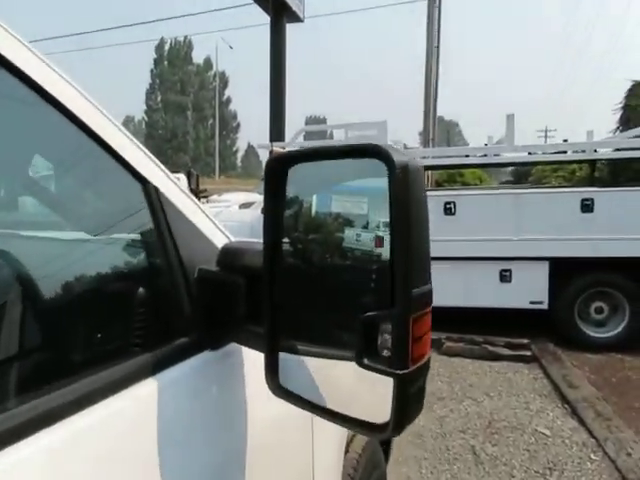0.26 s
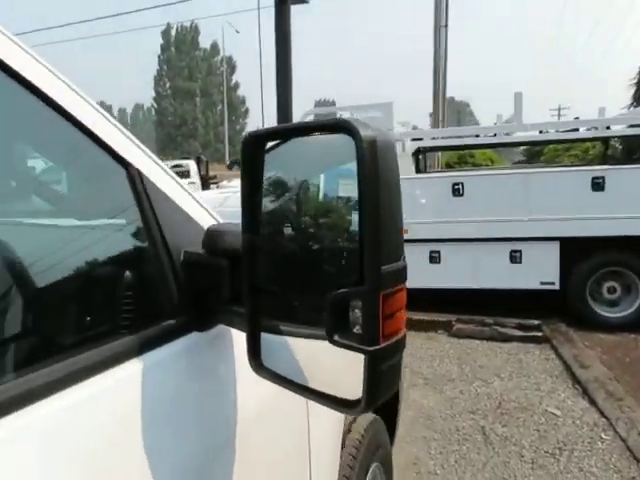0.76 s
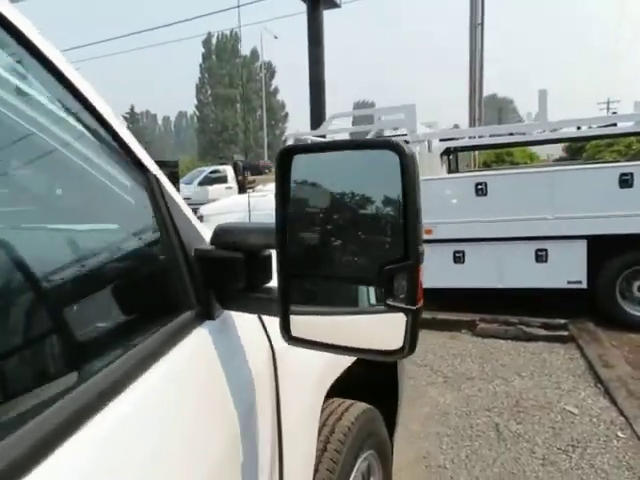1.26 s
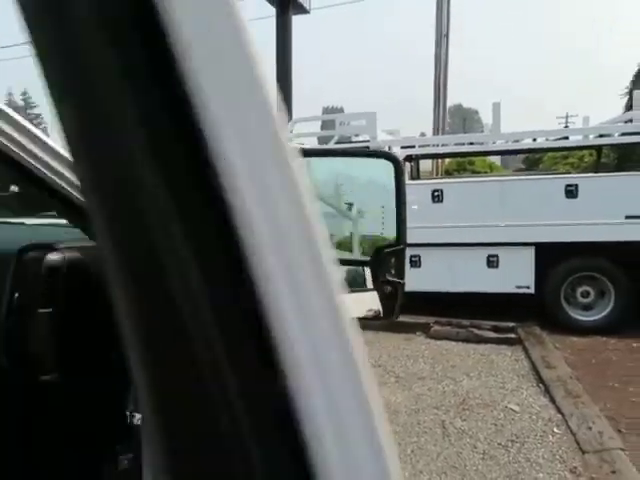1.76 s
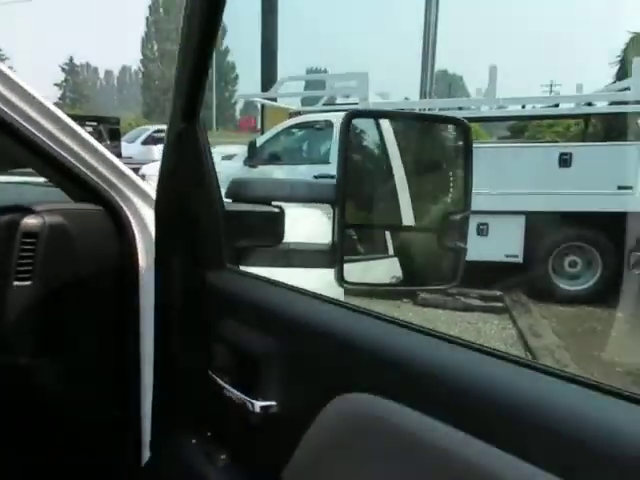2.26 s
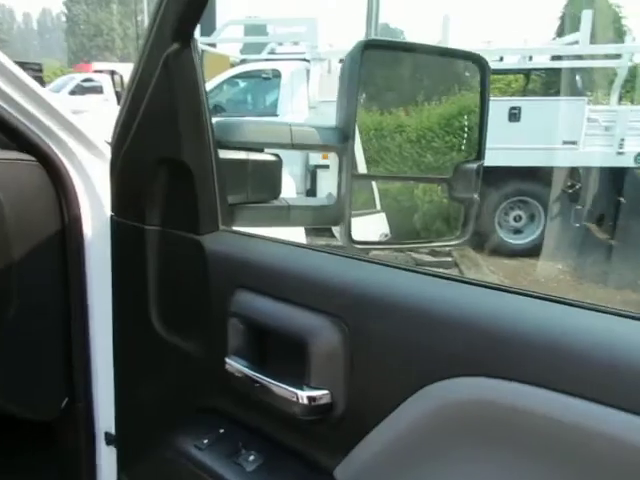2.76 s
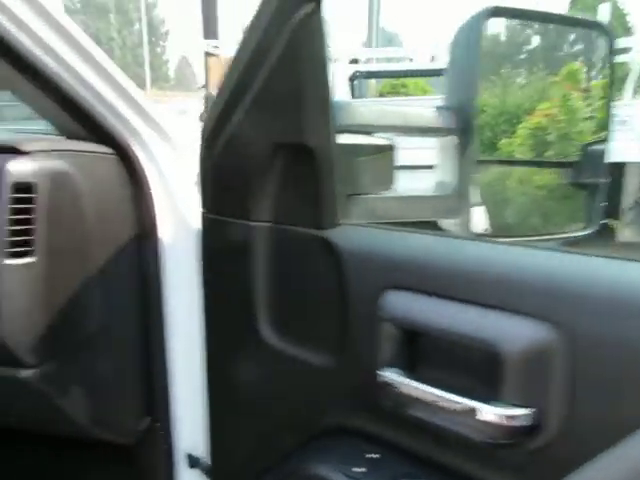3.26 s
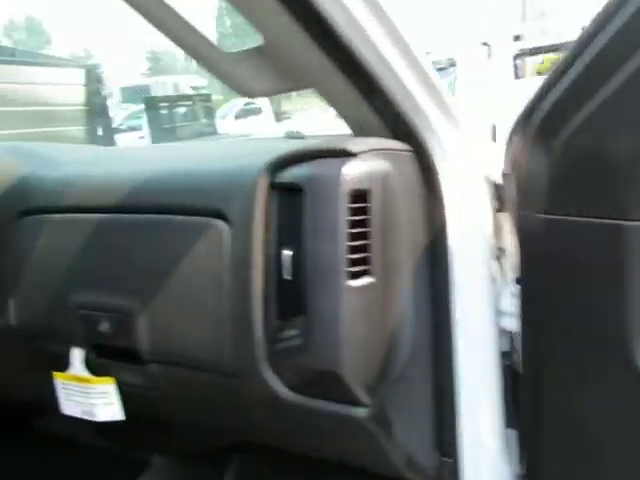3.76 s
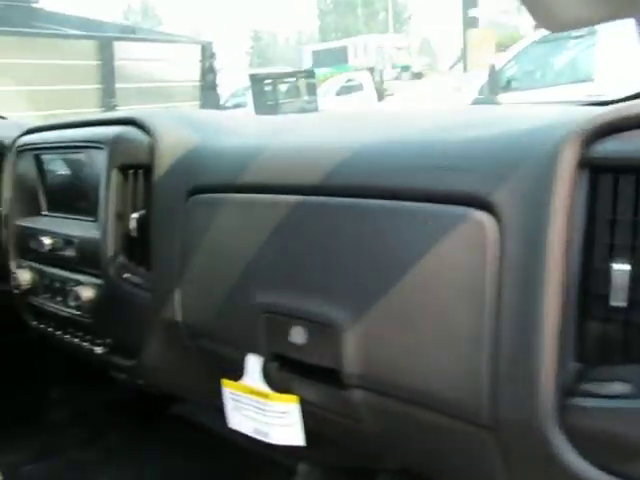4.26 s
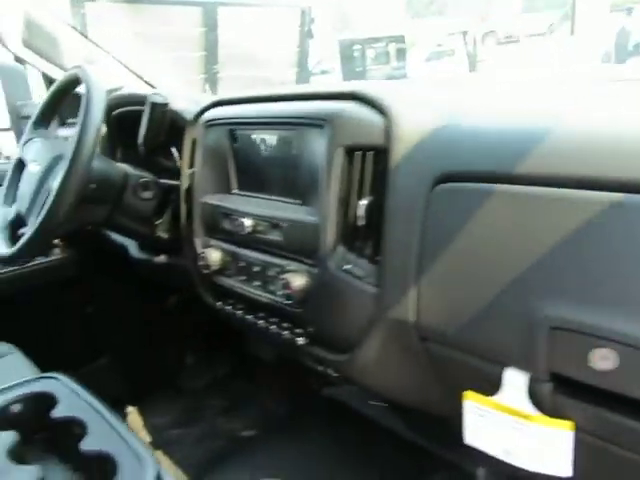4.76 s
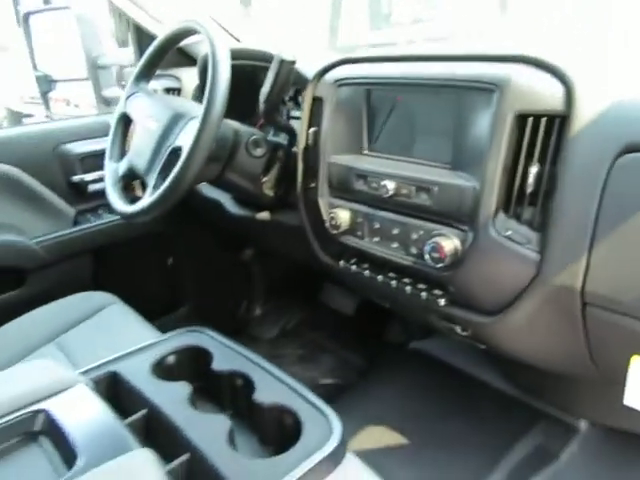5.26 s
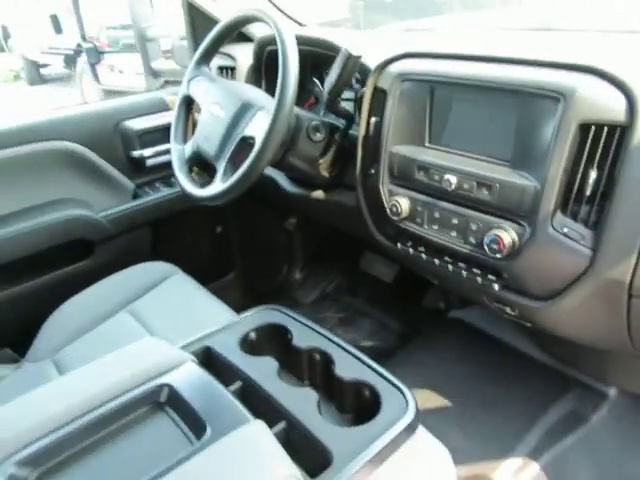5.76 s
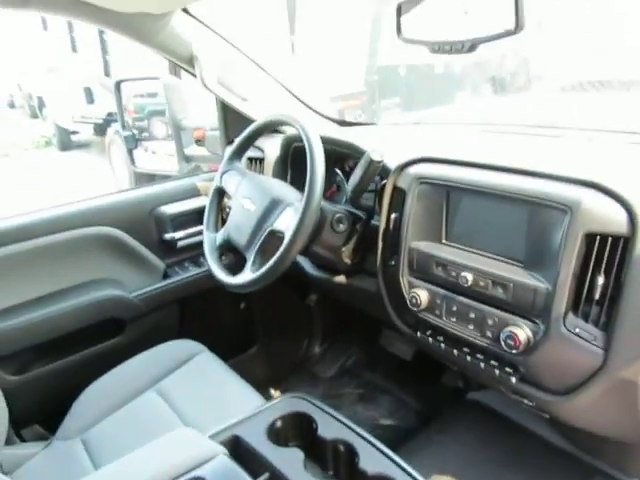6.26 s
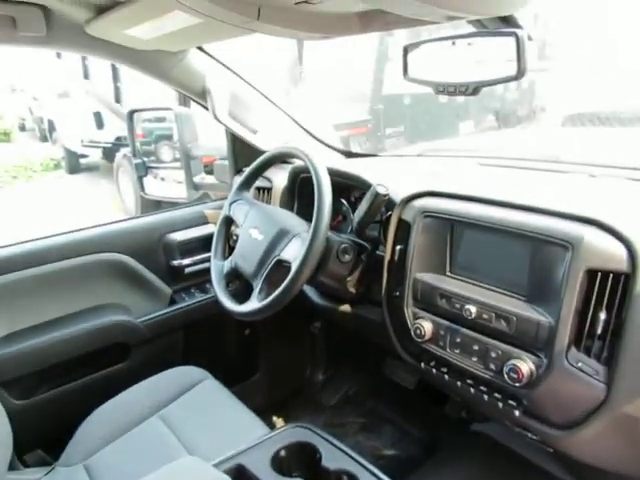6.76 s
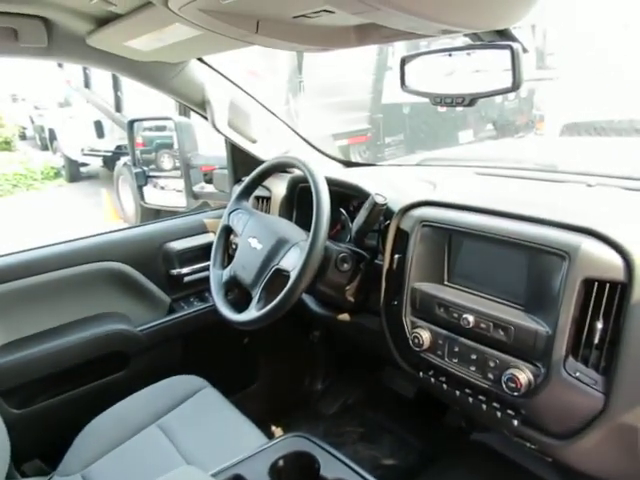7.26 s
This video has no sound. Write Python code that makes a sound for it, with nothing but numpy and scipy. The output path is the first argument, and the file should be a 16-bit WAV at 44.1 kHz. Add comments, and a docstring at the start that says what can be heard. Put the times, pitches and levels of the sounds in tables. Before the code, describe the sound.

In an open gravel yard, a diesel truck on a nearby road pulls away with a deep, throaty roar, changes gear and climbs in pitch as it recedes. Very close to the microphone a door handle clunks, then the latch releases with a sharp loud bang. Light ticks and scuffs follow, thickest midway, before the engine dwindles to faint road rumble and a distant throb.

```python
"""From a gravel yard: a six-cylinder diesel truck on a nearby road accelerates, shifts gear and fades.
Its exhaust is tones locked to the firings; block, valves, tyres and air are knocks and coloured noise.
Small ticks and scuffs, short pushes through resonances, lie from 0.2 to 6 s, thickest just after 3 s.
Close to the microphone a door handle is pulled at 0.8 s; at 1.3 s the latch lets go with a bang.
From 5.7 s a throb swells up from far off. The gain drops after loud peaks and creeps back."""
import sys
import numpy as np
from scipy.fft import rfft, irfft, next_fast_len
from scipy.io import wavfile
from scipy.ndimage import uniform_filter1d, map_coordinates

SR = 44100
rng = np.random.default_rng(int(sys.argv[2]) if len(sys.argv) > 2 else 0)


def master_out(mix):
    """Clip the mix to full scale and print it as 16-bit PCM to the path in sys.argv[1]."""
    frames = np.transpose(np.atleast_2d(mix))
    ceiling = np.clip(frames, -1, 1)
    pcm = np.round(ceiling * 32767).astype(np.int16)
    wavfile.write(sys.argv[1], SR, pcm)


N = 331191


def amp(db):
    """dB to gain."""
    return 10 ** (np.asarray(db) / 20)


def unit(x):
    """x at rms 1."""
    return x / np.sqrt(np.mean(x ** 2) + 1e-20)


def along(points, hz):
    """(frequency_hz, value) points read off on a log frequency axis."""
    point_hz, values = np.transpose(points)
    return np.interp(np.log(hz + 1), np.log(point_hz + 1), values)


def curves(rows):
    """One value per sample for each column after the time."""
    times_s, *columns = np.transpose(rows)
    return [np.interp(np.arange(N) / SR, times_s, column) for column in columns]


def wobble(rate):
    """A smooth random curve, rate knots a second."""
    knots = rng.standard_normal(int(N * rate / SR) + 4)
    return map_coordinates(knots, [np.arange(N) * rate / SR])


def filtered(x, response):
    """x times a complex response of frequency."""
    m = next_fast_len(N + SR // 2)
    return irfft(rfft(x, m) * response(np.fft.rfftfreq(m, 1 / SR)), m)[..., :N]


def body(modes):
    """Causal response of a set of resonances, with alternating signs."""
    def response(f):
        total = 0
        for k, (centre, width, db) in enumerate(modes):
            total = total + (-1) ** k * amp(db) * 1j * f * width / (centre ** 2 - f ** 2 + 1j * f * width)
        return total
    return response


def soft_body(modes, corner_hz):
    """Resonances struck by a soft contact, which dulls them above the corner."""
    return lambda hz: body(modes)(hz) / (1 + 1j * hz / corner_hz) ** 3


def rush(spectrum, alike, gate=1):
    """Stereo noise of rms 1, gated before it is coloured; alike is the left-right correlation."""
    def mid_side(hz):
        turn = np.arccos(np.clip(along(alike, hz), -1, 1)) / 2
        return amp(along(spectrum, hz)) * [np.cos(turn), np.sin(turn)]
    mid, side = filtered(gate * rng.standard_normal((2, N)), mid_side)
    return unit(np.array([mid + side, mid - side]))


def tone(cycles, db, flutter_db):
    """A sine of given rms level whose size flutters on the way through the air."""
    return np.sqrt(2) * amp(db + flutter_db * wobble(12)) * np.cos(2 * np.pi * cycles)


def burst(events, column, t60, rough, wide):
    """One push per event, dying 60 dB in t60 s; rough is its noise share, wide its left-right share."""
    out = np.zeros((2, N + SR))
    t = np.arange(SR // 10) / SR  # each push is cut at 0.1 s
    for row in events:
        noise = rng.standard_normal((2, len(t)))
        push = 1 - rough + rough * noise[0] + wide * noise[1] * np.array([[1], [-1]])
        level_db = row[1] + row[column] * (column > 1)  # column 1 is the peak level itself
        start = round(row[0] * SR)
        out[:, start:start + len(t)] += amp(level_db - 60 * t / t60) * push / np.sqrt(t60 * SR)
    return out[:, :N]


# The engine pulls, shifts gear and pulls away; boom is the second firing order.
# Columns: start_s, firing_rate_hz, boom_db, overtones_db
ENGINE = [(0, 56, -26.5, -34.5), (.1, 58.3, -19, -28), (.2, 61.82, -15, -28.5), (.4, 64.85, -12.5, -26),
          (.6, 67, -11.5, -24.5), (.7, 71, -12.5, -20.5), (1.07, 71.9, -15.5, -27),
          (1.2, 69.64, -14, -26.5), (1.38, 68.83, -14.5, -24.5), (1.5, 69.27, -13.5, -26),
          (1.65, 73.9, -15, -30), (1.95, 77.9, -17.5, -27.5), (2.1, 80.23, -20, -32),
          (2.25, 80.37, -15.5, -31), (2.7, 87.04, -17.5, -29), (3.0, 89.55, -18, -26.5),
          (3.3, 91.85, -18.5, -30.5), (3.45, 92.46, -18.5, -31), (3.9, 93.76, -23.5, -31.5),
          (4.1, 92.8, -29, -37), (4.5, 93.2, -32, -35), (4.95, 92.6, -41, -39.5), (5.25, 89.6, -37, -65),
          (5.75, 89.35, -40, -42), (6.2, 88.1, -61.5, -51.5)]
# Strength of successive firings, repeating each turn of the shaft. Column: level_db
CYLINDER_DB = [0, -4, -4]
# Road and engine noise; clatter, rumble and drone are relative to the roar.
# Columns: start_s, roar_db, clatter_over_roar_db, rumble_over_roar_db, drone_over_roar_db
ROAD = [(0, -26, -12.5, 1.5, -8), (.3, -24, -12.5, 1, -12.5), (.45, -22, -18, 1, -14),
        (.75, -23.5, -13.5, 1.5, -11.5), (1.07, -23.5, -13, -1.5, -15), (1.4, -27, -14.5, -3, -10.5),
        (1.65, -26, -13, -1, -15), (2.0, -28.5, -9.5, 1, -12.5), (2.55, -30, -12, 5, -10.5),
        (2.9, -28.5, -10, -1, -9), (3.2, -27, -13.5, 1, -15), (3.7, -28, -11.5, 0, -9.5),
        (4.05, -29.5, -11, 3, -12.5), (4.45, -28.5, -11, -3, -9.5), (4.9, -31.5, -9.5, 2, -5.5),
        (5.3, -35, -9.5, -0.5, -8.5), (6.0, -33.5, -12.5, 2, -9.5), (6.7, -34.5, -12, 0.5, -9.5),
        (7.5, -36, -10, 2.5, -8)]


def truck():
    """One firing count drives exhaust, knock and the struck noises, so all keep time together."""
    firing_hz, boom_db, overtone_db = curves(ENGINE)
    firings = np.cumsum(firing_hz) / SR + 0.018 * wobble(6)
    pipe = exhaust(firings, firing_hz, boom_db, overtone_db)
    count = np.floor(firings).astype(int)
    size = amp(np.array(CYLINDER_DB)[count % len(CYLINDER_DB)] + 1.5 * rng.standard_normal(2000)[count])
    strike = size * np.exp(-4.5 * (firings % 1))  # each firing hits and dies away
    roar_db, clatter_db, rumble_db, drone_db = curves(ROAD)
    rumble_db, clatter_db, drone_db = roar_db + rumble_db, roar_db + clatter_db, roar_db + drone_db
    near = amp(0.82 * (boom_db.clip(-45, -15) + 1.5))  # a distant engine blurs into even noise
    noise = road_noise(roar_db, clatter_db, rumble_db, drone_db, near * strike)
    puffs = np.diff(count, prepend=0) * size
    return pipe + noise + combustion_knock(puffs, near, clatter_db)


# Firing orders of the overtones, as multiples of the firing rate, and their levels.
# Columns: order; level_over_overtones_db
FIRING_ORDERS = [1, 3, 4, 5, 6]
ORDER_DB = [-5, 0.5, 0, -2, -4.5]
# What pipe and street do to an overtone at each pitch. Columns: pitch_hz, level_db
PASSAGE = [(55, -11), (70, 4), (170, 0.5), (205, -4), (230, 9.5), (252, -2), (280, -24.5), (300, 1),
           (325, 1.5), (345, -9), (372, 1.5), (420, -16), (460, 2.5), (485, 2), (510, -18.5), (560, -25.5)]
# Share of that colour while the truck is close, until when, and the moment it is whole
NEAR_SHARE, NEAR_S, CLEAR_S = 0.2, 0.8, 0.99
# A hum between the orders. Columns: start_s, level_db
SIDE_TONE = [(0, -23.5), (.2, -28), (.65, -61.5), (1.07, -40.5), (1.38, -35.5), (2.4, -26.5), (2.85, -30.5),
             (3.2, -59), (6.2, -57.5)]
SIDE_ORDER = 8 / 3  # times the firing rate
# Uneven cylinders leave tones at thirds of the firing rate.
# Columns: thirds, level_over_shaft_db; then start_s, shaft_db
SHAFT = [(4, -20.5), (5, -6), (7, -7), (10, -16), (11, -15.5), (13, -9.5), (14, -10.5), (16, -11.5),
         (17, -23), (19, -16.5), (20, -21.5), (21, -17)]
SHAFT_LEVEL = [(0, -29.5), (.35, -25.5), (.7, -23), (1.35, -32.5), (2.2, -34), (3.5, -33), (4.5, -38.5),
               (6.2, -63)]
# A cover rings with the high firing orders. Columns: start_s, resonance_hz, level_db
COVER = [(2.45, 1151, -63), (2.65, 1176, -42.5), (2.78, 1229, -39.5), (2.95, 1180, -43), (3.05, 1236, -39),
         (3.09, 1210, -54), (3.18, 1215, -44), (3.21, 1219, -38), (3.26, 1242, -47), (3.31, 1254, -40),
         (3.43, 1290, -42.5), (3.5, 1244, -39), (3.6, 1134, -43.5), (4, 1140, -44.5), (4.1, 1266, -61),
         (4.25, 1268, -43), (4.7, 1260, -50), (4.95, 1100, -49), (5.2, 1103, -65)]


def exhaust(firings, firing_hz, boom_db, overtone_db):
    """Firing orders in step add up to a sharp suction pulse a firing; shaft orders swell it once a turn."""
    share = np.interp(np.arange(N) / SR, [NEAR_S, CLEAR_S], [NEAR_SHARE, 1])
    levels = []
    for order, db in zip(FIRING_ORDERS, ORDER_DB):
        colour_db = share * along(PASSAGE, order * firing_hz)
        levels.append((order, overtone_db + db + colour_db + 0.97 * wobble(4.6)))
    levels.append((2, boom_db + 0.6 * wobble(6)))
    levels.append((SIDE_ORDER, curves(SIDE_TONE)[0]))
    pipe = np.zeros(N)
    for order, db in levels:
        drift = (0.02 + 0.04 * share) * wobble(12)  # in cycles
        pipe -= tone(order * firings + drift, db, flutter_db=1.2)

    turns = firings / len(CYLINDER_DB)
    shaft_db, = curves(SHAFT_LEVEL)
    for third, db in SHAFT:
        pipe -= tone(round(third) * turns + 0.07 * wobble(6.6), shaft_db + db, flutter_db=2)

    cover_hz, cover_db = curves(COVER)
    for third in range(33, 46):
        off = (third * firing_hz / len(CYLINDER_DB) - cover_hz) / 75  # distance from the resonance
        db = cover_db - 6.9 * (third % len(CYLINDER_DB) > 0)  # weaker between whole orders
        pipe += tone(third * turns + 0.12 * wobble(8), db, flutter_db=1.0) / (1 + off ** 2)
    return pipe


# Resonances of the engine block, each passed twice. Columns: pitch_hz, width_hz, level_db
BLOCK = [(1200, 410, 1.5), (1590, 580, -0.5)]
KNOCK_DB = 1  # over the clatter, before distance softens it


def combustion_knock(puffs, near, clatter_db):
    """One clean impulse a firing rings the block and weakens with the boom."""
    ringing = unit(filtered(puffs, lambda hz: body(BLOCK)(hz) ** 2))
    return near * amp(clatter_db + KNOCK_DB) * ringing


# Noise colours, relative density. Columns of all five: pitch_hz, level_db
RUMBLE = [(12, -33.5), (20, -7.5), (31, -4), (43, -4.5), (65, -1), (97, -2.5), (113, -14.5), (130, -20),
          (170, -40), (290, -120)]
ROAR = [(65, -32.5), (110, 1), (140, -2), (173, 1), (237, -10.5), (296, -2), (372, -9), (456, -7),
        (600, -11), (900, -43.5), (2200, -120)]
DRONE = [(350, -40.5), (520, -11.5), (650, -2.5), (800, -3.5), (950, -7), (1100, -9.5), (1400, -40.5),
         (2200, -120)]
CLATTER = [(600, -41.5), (900, -10.5), (1050, -4.5), (1150, 0.5), (1240, 0.5), (1320, -1.5), (1450, -2),
           (1660, -5), (1900, -11.5), (2470, -55), (4180, -120)]
TICKING = [(1000, -27), (1700, -6), (2000, -5), (2400, -11), (2750, -12.5), (3100, -17.5), (3600, -22.5),
           (5000, -34), (9000, -50.5), (15000, -58)]
TICKING_DB = -10  # valves over the clatter
# How alike the two channels are. Columns: pitch_hz, left_right_correlation
ALIKE = [(70, 1), (200, .9996), (1200, .997), (2500, 0.85), (5000, 0.7)]


def road_noise(roar_db, clatter_db, rumble_db, drone_db, strike):
    """Rumble is ungated noise; roar, drone, clatter and valves are noise struck once a firing."""
    gust = wobble(3.07)  # shared by all layers
    road = amp(rumble_db + 0.5 * wobble(3.1) + 0.31 * gust) * rush(RUMBLE, ALIKE)
    level = amp(roar_db + 0.74 * gust + 1.1 * wobble(12))
    road = road + level * rush(ROAR, ALIKE, 0.3 + 1.6 * strike)
    level = amp(drone_db + 0.6 * gust + 0.6 * wobble(11))
    road = road + level * rush(DRONE, ALIKE, 0.4 + 1.3 * strike)
    level = amp(clatter_db + 0.46 * gust + 0.8 * wobble(12))
    road = road + level * rush(CLATTER, ALIKE, 0.3 + 2 * strike)
    level = amp(clatter_db + TICKING_DB + 2.0 * gust + 0.66 * wobble(8.6))
    return road + level * rush(TICKING, ALIKE, 0.68 + 1.0 * strike)


# Door blows, levels before the resonances; thud and crack add to the peak.
# Columns: start_s, peak_db, low_thud_db, bright_crack_db
BLOWS = [(.829, -16, 0, -34.5), (.8418, 4, 5.5, -28.5), (.852, -12, 9.5, -17), (.865, -11, -7.5, -8.5),
         (.874, -2.5, 4, -22), (.888, -5.5, -2.5, -37), (1.2648, 8.5, -23, -1), (1.2693, 9.5, 3.5, -23.5),
         (1.2775, -7.5, 2.5, -15), (1.2905, -5, 5, -23), (1.304, -8.5, 5, -24.5)]
# Resonances of door panel and latch. Columns of both: pitch_hz, width_hz, level_db
PANEL = [(179, 70, 5), (366, 85, 2), (465, 190, -4), (680, 170, -4.5), (855, 82, -15.5)]
LATCH = [(803, 180, 7), (1000, 170, 5.5), (1465, 240, 4.5), (1990, 440, -7), (2530, 900, -5.5),
         (3900, 1400, -21), (5400, 2100, -31.5), (8000, 2200, -42)]


def door_blows():
    """Handle and latch blows, close by: short pushes and longer rough ones ring the panel and the latch."""
    push = burst(BLOWS, column=2, t60=0.0019, rough=0.037, wide=0.04)
    thud = amp(29.0) * filtered(push, soft_body(PANEL, corner_hz=1880))
    push = burst(BLOWS, column=2, t60=0.081, rough=1.0, wide=0.05)
    shudder = amp(30.0) * filtered(push, soft_body(PANEL, corner_hz=2500))
    push = burst(BLOWS, column=3, t60=0.0009, rough=0.021, wide=0.03)
    crack = amp(27.5) * filtered(push, soft_body(LATCH, corner_hz=3580))
    push = burst(BLOWS, column=3, t60=0.032, rough=0.83, wide=0.12)
    rattle = amp(26.0) * filtered(push, soft_body(LATCH, corner_hz=12000))
    push = burst(BLOWS, column=3, t60=0.14, rough=0.98, wide=0.03)
    dull_rattle = amp(38) * filtered(push, soft_body(LATCH, corner_hz=750))
    return thud + shudder + crack + rattle + dull_rattle


# Small ticks, knocks and scuffs, levels before the resonances; the last three add to the peak.
# Columns: start_s, peak_db, treble_db, low_knock_db, scuff_db
TICKS = [(.161, -35.5, -35, 15, 17.5), (.175, -31.5, -43.5, 13, 14.5), (.359, -31, -36, 21, 11),
         (.866, -24.5, 12.5, -11, 4.5), (3.0605, -24.5, 24.5, 8, 11), (3.102, -15, -10.5, 1, 10.5),
         (3.131, -27.5, -7.5, 17.5, 22.5), (3.2, -42, -21, 11, 26.5), (3.277, -26.5, 6.5, 8.5, 18.5),
         (3.284, -34.5, 13, -1, 14.5), (3.491, -35.5, -31.5, 0, 9.5), (3.888, -31, 4.5, 11, 22),
         (5.695, -32, -20.5, 13.5, 20), (5.974, -41, -16, 23.5, 28.5)]
# Resonances of trim, padding and bright snap. Columns of all three: pitch_hz, width_hz, level_db
TRIM = [(800, 240, -5.5), (1350, 1200, 13.5), (2770, 200, -2.5), (4300, 1200, -7.5)]
PADDING = [(600, 220, 1), (1120, 500, 0.5), (1780, 730, -4.5)]
SNAP = [(2000, 1100, 0.5), (4170, 1600, -1.5), (6300, 2200, -7.5), (10000, 3000, -23.5)]


def small_ticks():
    """Ticks mix trim ring, scuff, low knock and, in some, a bright snap."""
    push = burst(TICKS, column=1, t60=0.0018, rough=0.3, wide=0.08)
    click = amp(21) * filtered(push, soft_body(TRIM, corner_hz=5000))
    push = burst(TICKS, column=1, t60=0.016, rough=0.98, wide=0.08)
    rustle = amp(22) * filtered(push, soft_body(TRIM, corner_hz=5500))
    push = burst(TICKS, column=4, t60=0.028, rough=0.98, wide=0.1)
    scuff = amp(30) * filtered(push, soft_body(PADDING, corner_hz=3800))
    push = burst(TICKS, column=3, t60=0.0047, rough=0.067, wide=0.03)
    knock = amp(27.5) * filtered(push, soft_body(PANEL, corner_hz=1900))
    push = burst(TICKS, column=2, t60=0.01, rough=0.8, wide=0.4)
    snap = amp(15.5) * filtered(push, soft_body(SNAP, corner_hz=16000))
    return click + rustle + scuff + knock + snap


# A late throb returns from far off in swells. Columns: start_s, end_s, level_near_300_hz_db, level_above_db
THROB = [(5.693, 6.27, -50, -44), (6.22, 6.52, -40, -61), (7.25, 7.4, -49, -65)]
THROB_HZ, THROB_EDGE_DB_PER_S = 29.08, 200  # about a shaft turn; slope outside each swell
# Resonances of the far street; the low one is passed twice. Columns of both: pitch_hz, width_hz, level_db
FAR_LOW = [(298, 33, 0)]
FAR_HIGH = [(465, 35.4, -0.5), (587, 46, -5), (749.5, 60, -7), (1038, 67, 3)]


def throb():
    """Steady pulses, about one a shaft turn, through the resonances of the far street."""
    t = np.arange(N) / SR
    low = high = 0
    for start, end, low_db, high_db in THROB:
        edge_db = THROB_EDGE_DB_PER_S * np.maximum(start - t, t - end).clip(0)
        low = low + amp(low_db - edge_db)
        high = high + amp(high_db - edge_db)
    beat_count = np.floor(THROB_HZ * (np.arange(N + 1) / SR - THROB[0][0]))
    beats = np.diff(beat_count) * amp(2.2 * wobble(30))
    low_ring = unit(filtered(beats, lambda hz: body(FAR_LOW)(hz) ** 2))
    high_ring = unit(filtered(beats, lambda hz: body(FAR_HIGH)(hz) / (1 + 1j * hz / 1400) ** 4))
    return low * low_ring + high * high_ring


# Colour of the microphone hiss. Columns: pitch_hz, level_db
HISS = [(120, -32), (300, 9), (600, 1.5), (1200, -4.5), (2000, -6.5), (3000, -7.5), (4200, -7),
        (6500, -11.5), (8000, -14.5), (10000, -18), (12000, -21.5), (14000, -28), (15000, -25.5),
        (15700, -33.5)]


def hiss():
    """Faint noise, nearly independent in the two microphone ports except in the top treble."""
    alike = [(2500, 0.05), (6000, 0.03), (12000, 0.16), (15000, 0.4)]  # pitch_hz, correlation
    return amp(-54.5) * rush(HISS, alike)


# How the left microphone port differs from the right.
# Columns: pitch_hz, left_lead_radians; then pitch_hz, left_over_right_db
PORTS = [(60, 0), (150, -0.04), (400, 0.12), (700, -0.06), (2400, 0.1), (3100, 0.25), (4000, 0.8),
         (5000, 2.3), (6200, 3.2), (15000, 2.9)]
LEFT_DB = [(40, 0), (150, .2), (500, 0), (1200, -.3), (3000, 0)]


def scene():
    """All but the hiss reaches the two ports in step in the bass, against each other in the treble."""
    def port_response(hz):
        left_over_right = np.exp(1j * along(PORTS, hz)) * amp(along(LEFT_DB, hz))
        return left_over_right ** np.array([[0.5], [-0.5]])  # half to each side
    sources = truck() + throb() + door_blows() + small_ticks()
    return filtered(sources, port_response) + hiss()


TOP_HZ = 15700  # nothing passes above


def record(dry):
    """Gain control acts late on peaks over its ceiling and recovers slowly; what slips through is clipped."""
    ceiling_db, recover_db_per_s, late = -4.5, 8, round(0.049 * SR)
    ramp = recover_db_per_s * np.arange(N) / SR
    need = np.minimum(0, ceiling_db - 20 * np.log10(np.abs(dry).max(0) + 1e-9))
    gain_db = np.minimum(0, ramp + np.minimum.accumulate(need - ramp))
    gain_db = uniform_filter1d(np.pad(gain_db, (late, 0))[:N], size=2600)
    x = dry * amp(gain_db)
    x = x / (1 + np.abs(x).max(0) ** 5) ** (1 / 5)  # soft clip, both channels together
    return filtered(x, lambda hz: (hz < TOP_HZ) / np.sqrt(1 + (27 / (hz + 1)) ** 6))  # bass cut near 27 Hz


dry = scene()
out = record(dry)
master_out(out)
```